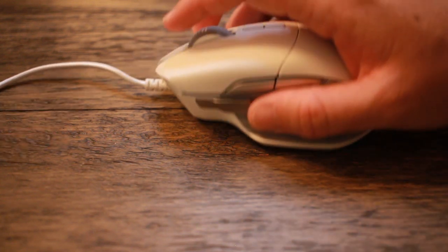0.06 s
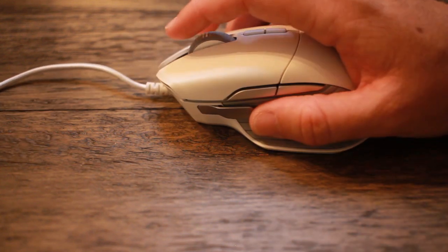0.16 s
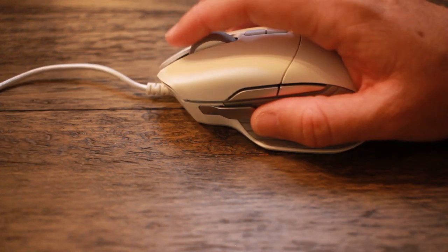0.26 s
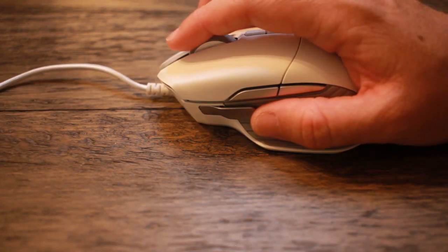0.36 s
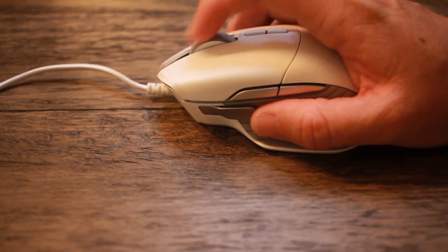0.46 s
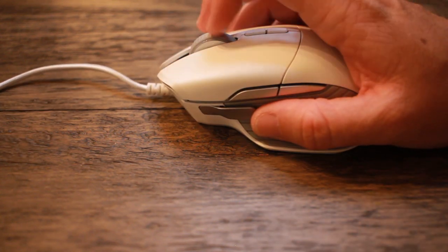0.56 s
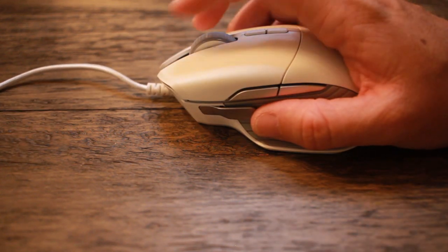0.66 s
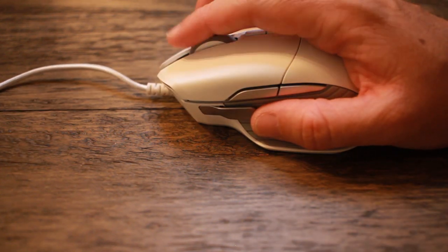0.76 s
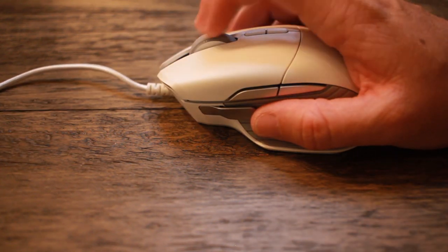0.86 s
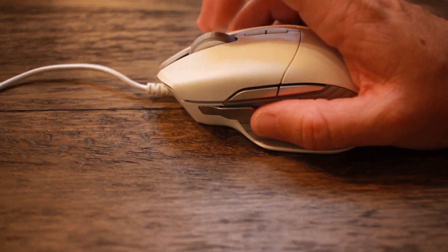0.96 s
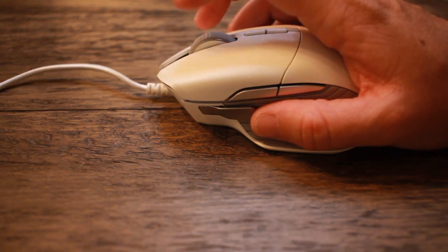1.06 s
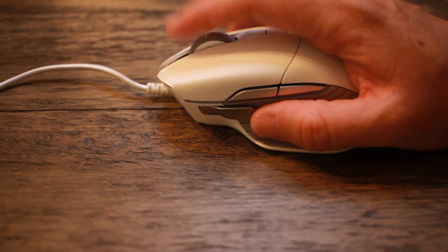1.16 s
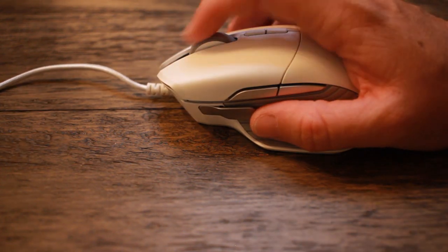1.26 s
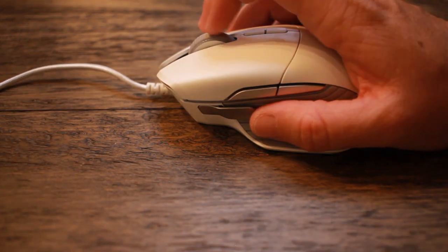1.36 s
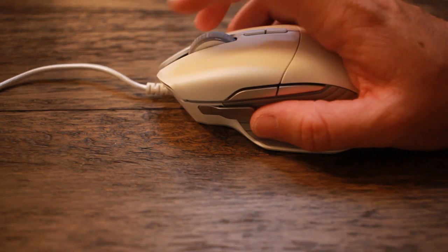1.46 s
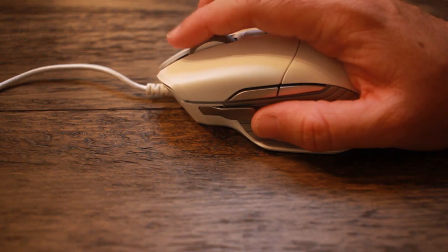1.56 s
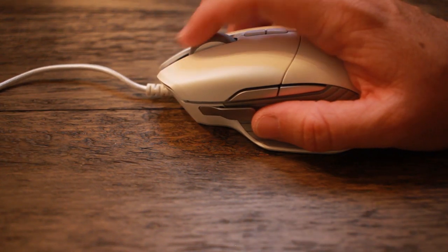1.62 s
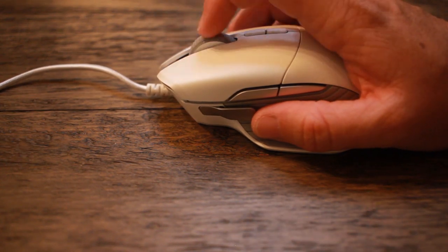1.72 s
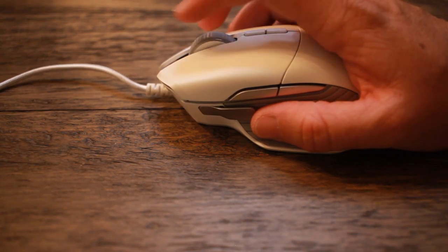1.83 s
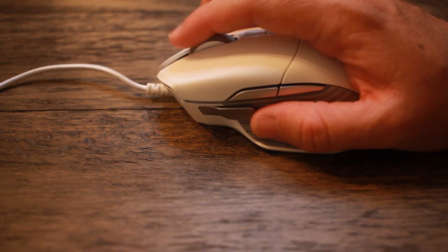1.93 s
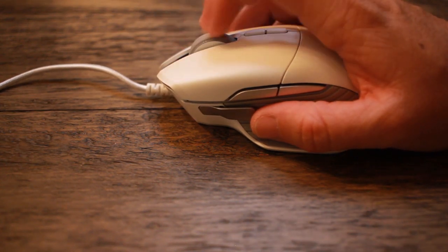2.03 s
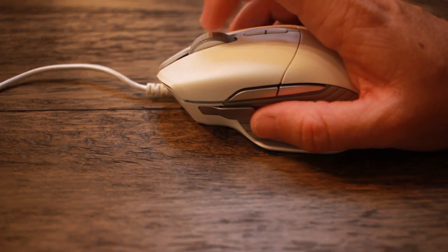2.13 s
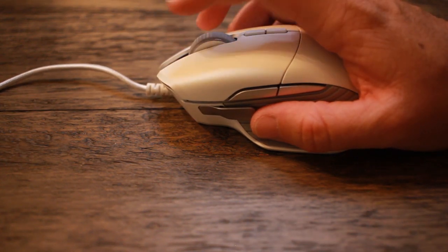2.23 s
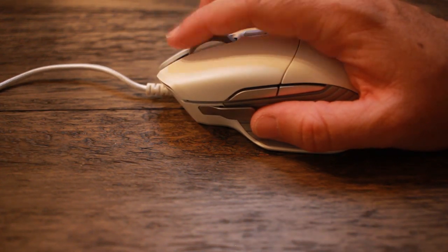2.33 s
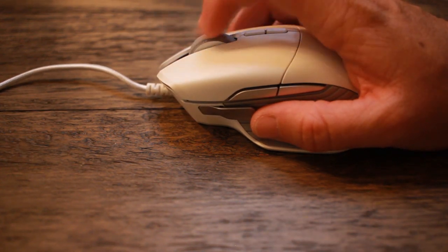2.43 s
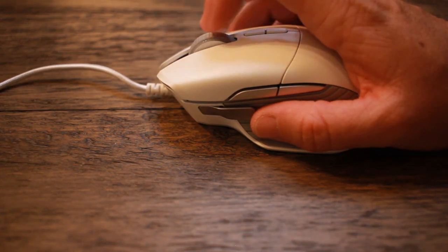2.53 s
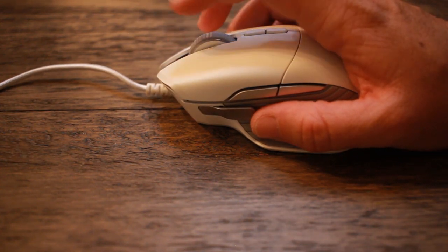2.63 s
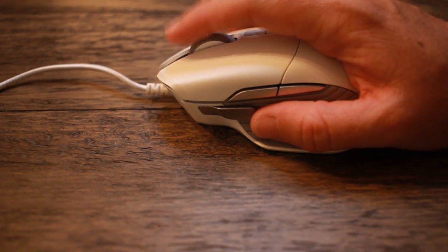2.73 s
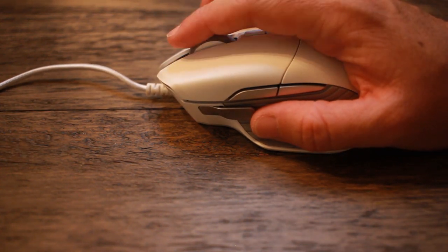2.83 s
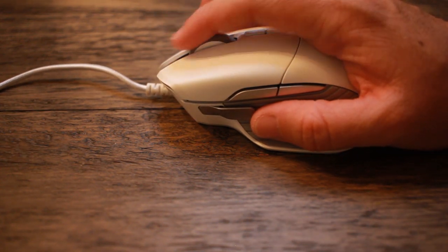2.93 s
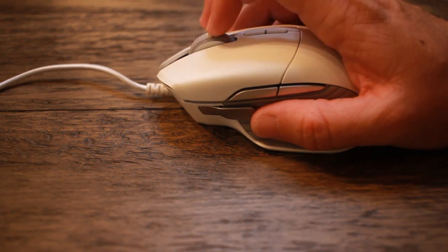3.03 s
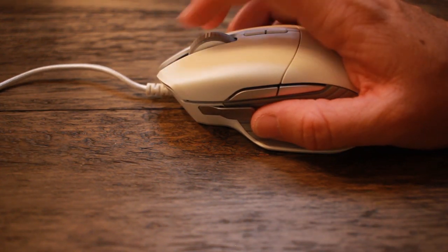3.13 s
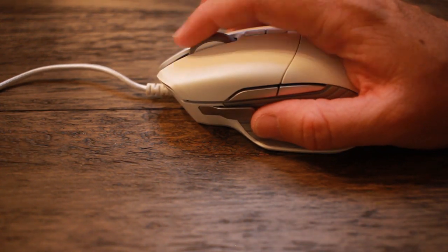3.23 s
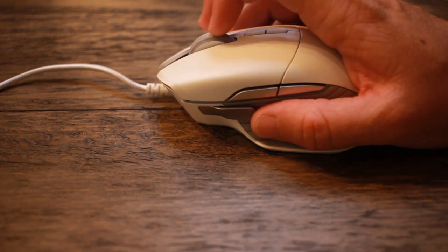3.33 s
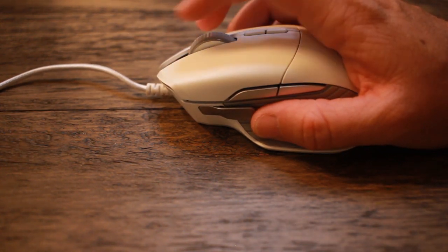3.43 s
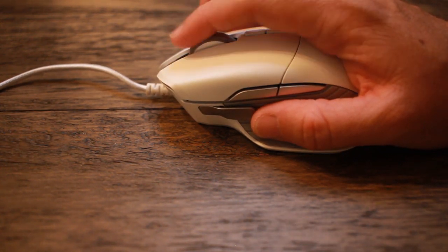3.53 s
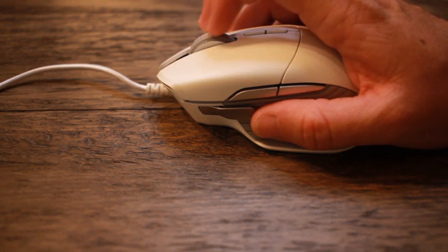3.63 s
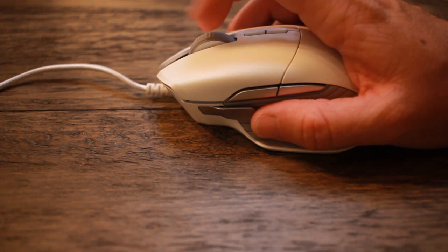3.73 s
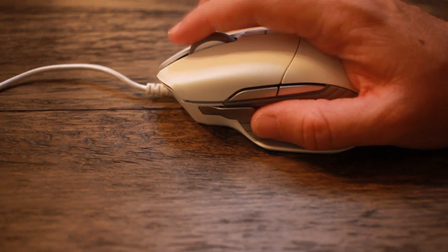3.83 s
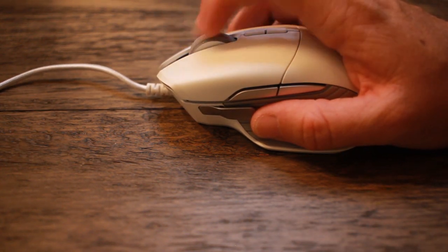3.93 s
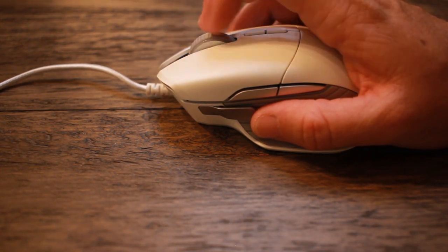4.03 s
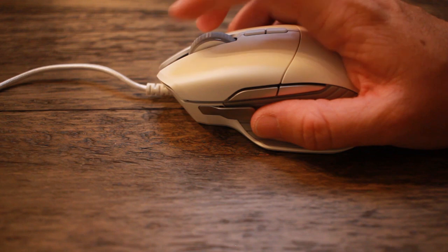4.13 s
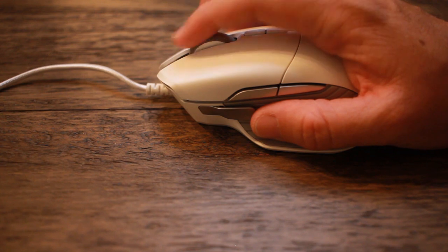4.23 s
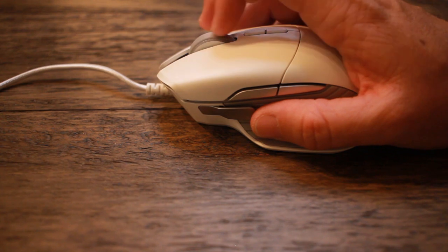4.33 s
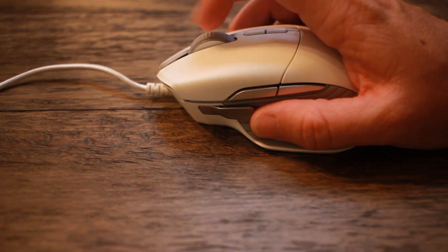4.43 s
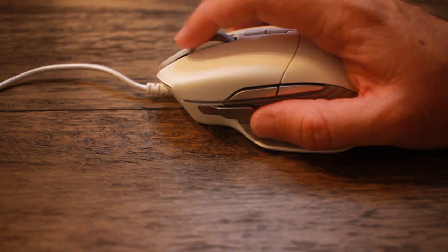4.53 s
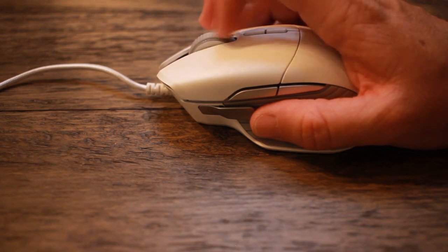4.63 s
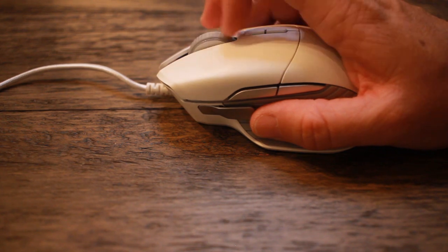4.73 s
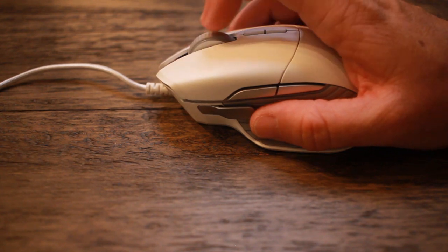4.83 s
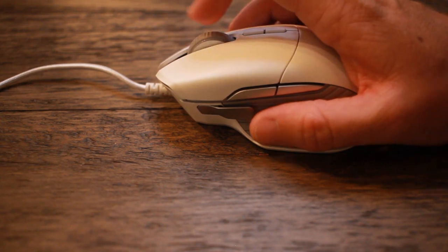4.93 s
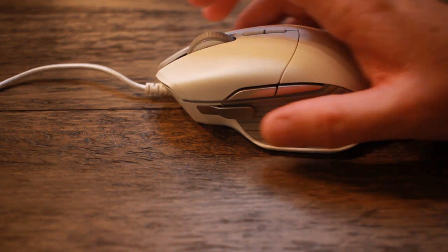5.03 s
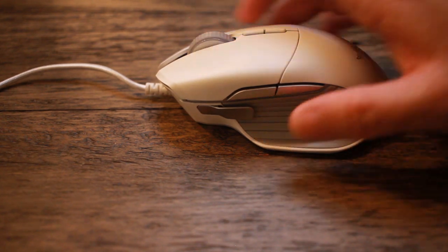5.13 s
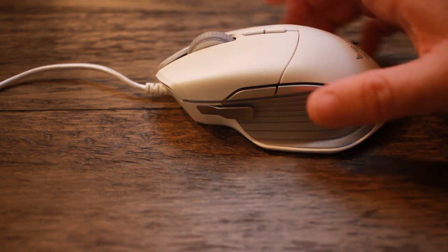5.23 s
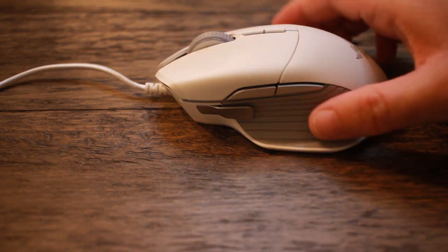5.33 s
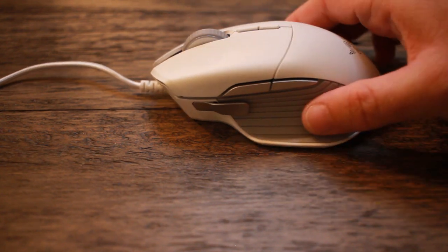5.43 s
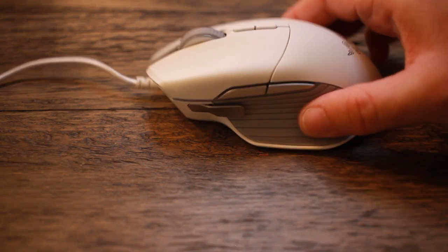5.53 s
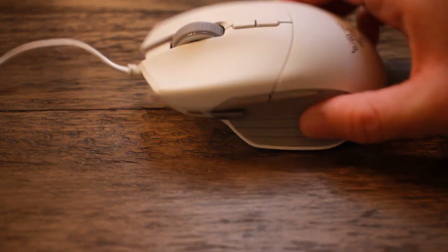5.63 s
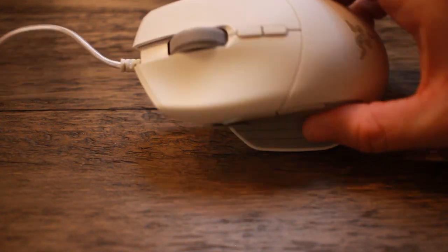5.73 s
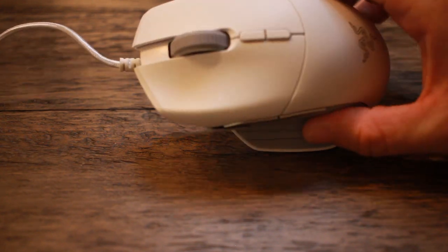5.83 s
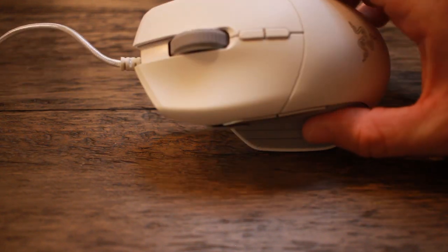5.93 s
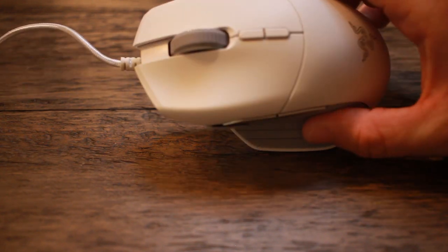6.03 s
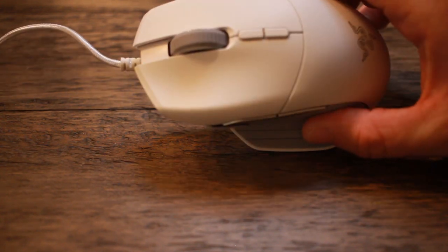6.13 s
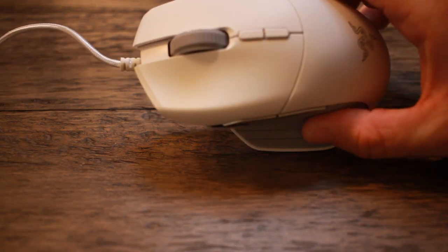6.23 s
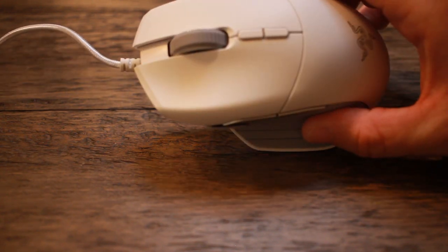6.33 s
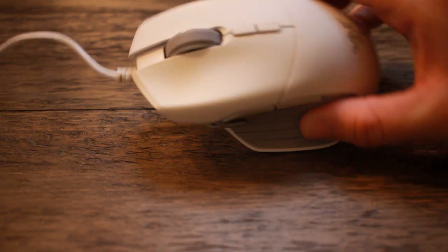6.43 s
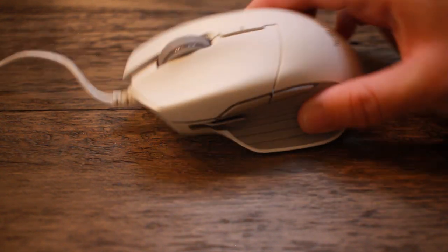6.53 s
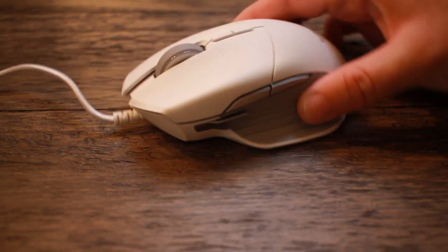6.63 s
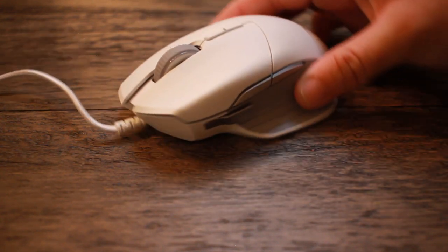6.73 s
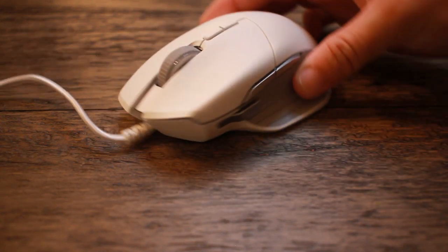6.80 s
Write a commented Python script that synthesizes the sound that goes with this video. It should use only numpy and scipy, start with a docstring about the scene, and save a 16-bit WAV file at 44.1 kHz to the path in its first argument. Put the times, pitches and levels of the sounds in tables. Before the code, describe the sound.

Close, crisp ratchet bursts from a heavy mouse wheel, framed by two solid set-down thuds on a wooden desk in a quiet room.

```python
"""A mouse thumps down on a wooden desk in a quiet room, then its stiff notched wheel clicks in short strokes.
Set-downs, finger landings, lifts and bumps are short soft blows that ring the desk and the mouse's shell.
Sliding is uneven noise: a low rumble rung through the desk and a hiss of skin and feet.
Each wheel notch is a quick run of tiny contacts that rings the wheel, the spring and the plastic shell.
A faint echo, room tone and hiss surround it all, heard close up."""
import sys
import numpy as np
from scipy import signal
from scipy.io import wavfile
from scipy.ndimage import uniform_filter1d

SR = 44100
rng = np.random.default_rng(int(sys.argv[2]) if len(sys.argv) > 2 else 0)


def wav_out(sig):
    """Save sig, one row per channel (or a flat mono array), as 16-bit PCM at SR to the path in sys.argv[1]."""
    wavfile.write(sys.argv[1], SR, np.round(np.clip(np.atleast_2d(sig).T, -1, 1) * 32767).astype(np.int16))


N = 302671  # length in samples

# The mouse meets the desk: t/s, level/dB, f/Hz of the blow,
# then desk boom/dB, shell clack/dB and tick/dB, each relative to the blow
SET_DOWNS = [(.171, -9, 448, -34, -23, -29), (.191, -9, 340, -49, -10.5, -14.5),
             (.196, -15, 410, -30, -37, -20), (.209, -21, 340, -53, -10.5, -14),
             (6.757, -31.5, 500, -3, -2, -25), (6.77, -13.5, 331, -44, -15, -22),
             (6.773, -10, 364, -16, -15.5, -23)]
SET_DOWN_TICK_HZ, SET_DOWN_SCUFF_MS = 2700, 3.4
# The hand bumps the shell: t/s, level/dB, f/Hz of the blow, tick/dB relative to the blow, tick f/Hz
BUMPS = [(.423, -35.5, 355, -9, 4970), (2.876, -35.5, 440, -17, 2170), (2.911, -36.5, 351, -31, 1800),
         (2.932, -27.5, 372, -14.5, 3000), (3.205, -30, 523, -7, 2930), (4.963, -44, 555, 4.5, 1720),
         (4.98, -38.5, 836, -10, 2600), (5.028, -46.5, 574, 3.5, 3430), (5.042, -49, 366, 3, 3150),
         (5.361, -42, 382, -19, 2100), (5.432, -32, 443, -16, 5000), (5.468, -34.5, 766, -8, 1860),
         (5.528, -39, 744, -8, 1700), (5.695, -48, 414, 2, 3350), (5.757, -35.5, 343, -16, 4740),
         (5.775, -33.5, 237, -25, 3000), (6.61, -48, 350, -25, 1716), (6.66, -43, 361, -22, 3530)]
BUMP_BOOM_DB, BUMP_CLACK_DB, BUMP_SCUFF_MS = -13.5, -11.5, 3.2
# The finger leaves the wheel after a stroke: t/s, level/dB, f/Hz of the blow
LIFTS = [(.643, -26.5, 678), (1.022, -33, 805), (1.451, -34.5, 550), (3.14, -30.5, 540),
         (3.413, -29.5, 590), (4.092, -27.5, 783), (4.798, -38, 791)]
# Shared by all lifts: boom/dB, clack/dB, tick/dB relative to the blow, tick f/Hz, scuff decay/ms
LIFT_SOUND = (-45, -7, -10.5, 5100, 1)
# The finger lands on the wheel before a stroke: t/s, level/dB, f/Hz of the blow, boom/dB relative to it
LANDINGS = [(.837, -39.5, 340, -5), (1.269, -39, 350, -10), (1.622, -33.5, 367, -5), (2.004, -42, 571, 1),
            (2.408, -30.5, 356, -3.5), (3.285, -33, 373, -4.5), (3.6, -42, 363, -4),
            (3.936, -37.5, 584, -6), (4.268, -32.5, 760, -6.5), (4.608, -32, 780, -0.5)]
# Shared by all landings: clack/dB, tick/dB relative to the blow, tick f/Hz, scuff decay/ms
LANDING_SOUND = (-12, -7, 4005, 7.5)

# Ways the desk top rings: f/Hz, relative level/dB, time to die by 60 dB with no hand on it/s
DESK_MODES = [(186.1, -5, 0.46), (245, -3.5, 0.32), (289.6, -2.5, 0.25), (353, -9, 0.42), (420, -5, 0.2),
              (446, -8, 0.21), (499.4, -7, 0.2), (662, -4, 0.046), (748.5, -9.5, 0.22), (847, -13, 0.15),
              (952, -9.5, 0.08), (1290, -17.5, 0.084)]
# Lowest ways the desk rings: f/Hz, relative level/dB, time to die by 60 dB/s
BOOM_MODES = [(55, -7.5, 0.24), (81.5, -3.5, 0.35), (120.25, 1.5, 0.35)]
# Ways the plastic shell rings: f/Hz, relative level/dB, time to die by 60 dB with no palm on it/s
SHELL_MODES = [(557, -8, 0.046), (781, -6, 0.078), (1015, -2.5, 0.041), (1239, -6, 0.024),
               (1520, -9, 0.021), (1795, -17.5, 0.033)]

# Hand or mouse sliding: t/s when full level is reached, rise/s, hold/s, fall/s,
# rumble level/dB, hiss level/dB, centre f/Hz of the hiss
SLIDES = [(0.212, 0.024, .003, 0.065, -31, -70, 3610), (0.297, 0.085, 0.15, 0.11, -52.5, -57.5, 5600),
          (.5, 0.11, 0.0028, 0.088, -61, -52, 5640), (3.06, 0.071, 0.016, 0.069, -47, -45, 4400),
          (3.211, 0.25, 0.059, 0.17, -48.5, -73, 4450), (4.977, 0.084, 0.072, 0.034, -55, -64, 3000),
          (5.41, .04, 0.15, 0.12, -51, -69, 4500), (5.434, .03, .03, 0.04, -50, -55.5, 4700),
          (5.695, .03, .003, .05, -43.5, -62, 4240), (5.732, 0.025, 0.027, 0.019, -49, -58, 4800),
          (5.77, 0.025, 0.032, 0.024, -44, -80, 4800), (6.665, .045, 0.069, .03, -45.5, -69, 3900),
          (6.73, 0.094, 0.15, 0.11, -54, -55.5, 4270), (6.77, 0.032, 0.056, 0.19, -40, -60, 4600)]
# Broad part of the sliding hiss: f/Hz, relative level/dB
SLIDE_HISS = [(700, -15), (1200, 5.5), (2500, 2), (7000, -9), (10000, -9.5), (14000, -21)]
SLIDE_END_DB = -20  # level at the ends of a slide, relative to its full level
HAND_DAMPING = 0.53  # the resting hand shortens the desk's ring times by this factor

# Wheel notches: t/s, level/dB (sets the loudness and the colour of each snap)
NOTCHES = [(0.493, -33), (0.4967, -26), (0.5052, -32), (0.5285, -16.5), (0.5436, -15.5), (0.5615, -17.5),
           (0.5894, -18.5), (0.841, -39), (0.8727, -30), (0.8919, -16.5), (0.9068, -16), (0.9206, -15.5),
           (0.9335, -15.5), (0.9504, -21.5), (0.9878, -20), (1.272, -42), (1.3067, -34), (1.3283, -18.5),
           (1.346, -17), (1.3611, -16), (1.377, -18.5), (1.3968, -19.5), (1.4521, -32), (1.6233, -40),
           (1.6816, -31), (1.7067, -19.5), (1.7326, -20.5), (1.7609, -21), (1.795, -21.5), (1.8327, -41),
           (2.008, -40), (2.04, -30), (2.0599, -17), (2.0732, -14.5), (2.086, -15.5), (2.0992, -16),
           (2.1149, -18.5), (2.1427, -19), (2.1739, -35), (2.4108, -40.5), (2.449, -30.5), (2.4689, -15),
           (2.4841, -15.5), (2.4963, -14.5), (2.5078, -19), (2.5259, -17), (2.5607, -24), (2.5904, -40.5),
           (3.009, -32), (3.0336, -18), (3.0499, -14.5), (3.0615, -16.5), (3.0749, -17), (3.0898, -18),
           (3.1369, -32.5), (3.2551, -32.5), (3.296, -41.5), (3.3259, -29), (3.3429, -15), (3.3544, -16),
           (3.3659, -15.5), (3.379, -18.5), (3.4101, -31.5), (3.6016, -39.5), (3.632, -29.5), (3.6512, -16),
           (3.665, -15.5), (3.6784, -14.5), (3.6939, -16.5), (3.7157, -20.5), (3.7692, -39.5), (3.938, -41),
           (3.962, -34.5), (3.98, -15.5), (3.9946, -15), (4.0062, -16.5), (4.019, -16.5), (4.036, -18),
           (4.271, -36.5), (4.2822, -39), (4.3125, -28), (4.32, -25), (4.339, -15), (4.352, -15),
           (4.3642, -17.5), (4.3788, -17), (4.3961, -18), (4.4579, -36), (4.61, -32), (4.6425, -22.5),
           (4.666, -16.5), (4.6812, -17.5), (4.6914, -14), (4.7052, -14.5), (4.7212, -18), (4.7558, -48),
           (4.7894, -44)]
# Contacts in one snap (slip off the crest, landing, rebounds): delay/ms, level/dB, treble level/dB
CONTACTS = [(0., -5.5, -4), (0.648, 1, 7), (1.202, -6, 3), (1.8, -16.5, -5), (3.002, -21.5, -37),
            (4.103, -5.5, -6), (5.398, -15, -32)]
# Ways the wheel rings: f/Hz, relative level/dB, time to die by 60 dB/s
WHEEL_MODES = [(2237, -6.5, 0.0078), (2747, -6, 0.011), (3023, -10.5, 0.02), (3525, -10.5, 0.0083),
               (3930, -6, 0.0089), (4316, -2.5, 0.0089), (4529, -3, 0.019), (5000, -0.5, 0.011),
               (5354, -7, 0.025), (5870, -5.5, 0.011), (6415, -1.5, 0.0059), (7200, -9, 0.013),
               (7520, -21.5, 0.024)]
# Ways the spring rings: f/Hz, relative level/dB, time to die by 60 dB/s
SPRING_MODES = [(7790, -7, 0.016), (8520, -0.5, 0.0039), (8850, -5.5, 0.0088), (9490, -2.5, 0.0043),
                (10580, -11, 0.0087), (11010, -13, 0.011), (11070, -3.5, 0.0065), (12440, -16, 0.0075),
                (13340, -9.5, 0.0057), (15270, -20, 0.013), (15600, -42, .006)]
FULL_SNAP_DB = -16  # notch level that counts as a full snap
HOLLOW_DB, TREBLE_DB = -12.8, -9  # starting balance of shell and spring in a full snap
HOLLOW_PER_DB, TREBLE_PER_DB = 0.4037, -0.34  # a weaker snap is hollower and duller, per dB below full
SCATTER_DB = 1.5  # random spread of that balance
PALM_DAMPING = 0.77  # the palm shortens the shell's ring times during strokes by this factor

# Time for echoes to die by 60 dB: f/Hz, time/s
ECHO_TIMES = [(100, 0.33), (260, 1), (700, 0.5), (1840, 0.42), (4850, 0.38), (12000, 0.29)]
# Room tone and hiss shared by both channels: f/Hz, relative level/dB
ROOM_TONE = [(15, -43), (25, -25), (58, 1), (76, 1), (153, -21.5), (190, 5), (263, -16.5), (301, -5.5),
             (326, -14.5), (591, -16), (677, -20), (2550, -27.5), (3340, -27.5), (14400, -33),
             (16000, -32.5)]
# Hiss with opposite signs in the two channels: f/Hz, relative level/dB
SIDE_HISS = [(15, -27), (25, -2), (489, -3.5), (4370, -5), (14800, 0), (16000, -16)]
ECHO_DB, ROOM_TONE_DB, SIDE_HISS_DB = -13, -54.5, -68.5
TOP_EDGE_HZ = 15900  # upper edge of the sound


def gain_of(db):
    """Turns decibels into a multiplier."""
    return 10 ** (np.asarray(db) / 20)


def evened(x):
    """Scales a sound so that its average strength (rms) is 1."""
    return x / np.sqrt(np.mean(x ** 2) + 1e-20)


def read(points, hz):
    """Reads a table between its points, along a log frequency scale."""
    f, value = np.transpose(points)
    return np.interp(np.log(hz + 1), np.log(f + 1), value)


def add(mix, s, sound, db=0):
    """Mixes a sound in at time s, at a level in dB."""
    part = mix[round(s * SR):][:len(sound)]
    part += gain_of(db) * sound[:len(part)]


def peaked(x):
    """Scales a sound so that its peak is 1."""
    return x / abs(x).max()


def ring(modes, count, vary_db=0, detune=1):
    """A struck object rings as a sum of dying sines of alternating sign; vary_db and detune colour one blow."""
    hz, db, t60 = np.transpose(modes)[:, :, None]
    t = np.arange(count) / SR
    sign = (-1.) ** np.arange(len(modes))[:, None]
    loudness = gain_of(db + vary_db - 60 * t / t60)
    return peaked((sign * loudness * np.sin(2 * np.pi * hz * detune * t)).sum(0))


def damped(modes, factor):
    """A touch soaks up vibration, so every mode dies sooner."""
    return [(hz, db, factor * t60) for hz, db, t60 in modes]


def noise(spectrum):
    """Steady noise: random spectra are shaped by a table and overlapped."""
    hz = np.fft.rfftfreq(1024, 1 / SR)
    real, imag = rng.standard_normal((N // 256 + 5, 513, 2)).T
    shaped = (real + 1j * imag) * gain_of(read(spectrum, hz))[:, None]
    return evened(signal.istft(shaped, nperseg=1024, noverlap=768)[1][:N])


def bandpass(x, low_hz, high_hz):
    """Keeps the sound between two frequencies."""
    return signal.lfilter(*signal.butter(2, [low_hz, high_hz], "band", fs=SR), x)


def all_blows():
    """Lists every knock with the boom, clack, tick and scuff of its kind."""
    rows = [(*row, SET_DOWN_TICK_HZ, SET_DOWN_SCUFF_MS) for row in SET_DOWNS]
    for s, db, hz, tick_db, tick_hz in BUMPS:
        rows.append((s, db, hz, BUMP_BOOM_DB, BUMP_CLACK_DB, tick_db, tick_hz, BUMP_SCUFF_MS))
    rows += [(*row, *LIFT_SOUND) for row in LIFTS]
    rows += [(*row, *LANDING_SOUND) for row in LANDINGS]
    return rows


def knocks():
    """A soft blow of nearly two swings rings the desk, while a scuff makes the shell clack and tick."""
    out = np.zeros(N)
    desk, boom = ring(DESK_MODES, count=SR // 2), ring(BOOM_MODES, count=SR // 2)
    shell = ring(SHELL_MODES[1:], count=2600)
    for s, db, hz, boom_db, clack_db, tick_db, tick_hz, scuff_ms in all_blows():
        turns = np.arange(0, 1.8, hz / SR)
        add(out, s, np.sin(2 * np.pi * turns) * np.hanning(len(turns)), db)
        push = np.hanning(len(turns) // 5 + 3)  # a slower blow reaches only the lower modes
        push /= push.sum()
        add(out, s, signal.oaconvolve(push, desk), db - 9)
        add(out, s, signal.oaconvolve(push, boom), db + boom_db)
        scuff = rng.standard_normal(1024) * np.exp(-np.arange(1024) * 1000 / SR / scuff_ms)
        add(out, s, peaked(signal.fftconvolve(scuff, shell)), db + clack_db)
        add(out, s, peaked(bandpass(scuff, 0.7 * tick_hz, 1.69 * tick_hz)), db + tick_db)
    return out


def handling():
    """Uneven friction shakes the desk modes and hisses as skin and feet slide."""
    t = np.arange(N) / SR
    lumps = evened(uniform_filter1d(rng.standard_normal(N), 300))
    # skin sticks and lets go in small jerks, about 90 a second
    catches = (rng.random(N) < 90 / SR) * rng.exponential(1.27, N)
    grit = gain_of(2.0 * lumps) + signal.oaconvolve(catches, np.exp(-np.arange(512) / 90))[:N]

    held_desk = ring(damped(DESK_MODES, HAND_DAMPING), count=8000)
    rumble = evened(signal.oaconvolve(rng.standard_normal(N) * grit, held_desk)[:N])

    # a spinning carrier lifts low noise up to the moving centre frequency
    full_s, *_, centre_hz = np.transpose(SLIDES)
    carrier = np.exp(2j * np.pi * np.cumsum(np.interp(t, full_s, centre_hz)) / SR)
    low = signal.lfilter(*signal.butter(2, 900, fs=SR), rng.standard_normal((2, N)))
    moving_band = evened((carrier * (low[0] + 1j * low[1])).real)
    hiss = evened((moving_band + gain_of(0.5) * noise(SLIDE_HISS)) * np.sqrt(grit))

    out = np.zeros(N)
    for s, rise, hold, fall, rumble_db, hiss_db, _ in SLIDES:
        outside = np.maximum(np.maximum((s - t) / rise, (t - s - hold) / fall), 0)
        envelope = uniform_filter1d(gain_of(SLIDE_END_DB * outside), 300)
        out += envelope * (gain_of(rumble_db) * rumble + gain_of(hiss_db) * hiss)
    return out


def wheel():
    """Every notch is a short run of contacts ringing wheel, spring and shell; each also jolts the desk."""
    out, jolts = np.zeros(N), np.zeros(N)
    held_shell = damped(SHELL_MODES, PALM_DAMPING)
    delay_ms, body_db, treble_db = np.transpose(CONTACTS)
    count = len(delay_ms)
    for s, db in NOTCHES:
        weaker_db = FULL_SNAP_DB - db
        hollow_db = HOLLOW_DB + HOLLOW_PER_DB * weaker_db + SCATTER_DB * rng.standard_normal()
        bright_db = TREBLE_DB + TREBLE_PER_DB * weaker_db + SCATTER_DB * rng.standard_normal()
        # later contacts vary more in time
        late_ms = delay_ms + .02 * rng.standard_normal(count) * np.sqrt(delay_ms)
        at = np.abs(np.round(late_ms * SR / 1000)).astype(int)
        # the spring chatters: a dying burst of noise under the contacts
        chatter = gain_of(-17) * rng.standard_normal(512) * np.exp(-np.arange(512) / 130)
        body, treble = chatter.copy(), chatter.copy()
        np.add.at(body, at, gain_of(body_db + 1.2 * rng.standard_normal(count)))
        np.add.at(treble, at, gain_of(treble_db + 1.5 * rng.standard_normal(count)))
        parts = [(WHEEL_MODES, body, db + 2.0),
                 (SPRING_MODES, treble, db + bright_db + 3.0),
                 (held_shell, body, db + hollow_db + 3.5)]
        for modes, contacts, level_db in parts:
            colour_db, shift = rng.standard_normal((2, len(modes), 1))
            rung = ring(modes, count=1800, vary_db=1.2 * colour_db, detune=1 + .008 * shift)
            add(out, s, peaked(signal.fftconvolve(contacts, rung)), level_db)
        add(jolts, s, np.hanning(64) / 32, db + hollow_db)
    boom, desk = ring(BOOM_MODES, count=SR // 2), ring(DESK_MODES, count=SR // 2)
    shaken_desk = gain_of(-9.5) * boom + gain_of(-10.5) * desk
    return out + signal.oaconvolve(jolts, shaken_desk)[:N]


def room(x):
    """Sparse echoes die at a different speed in each band; three tails take turns at a steady rate."""
    slots, out = np.arange(300, SR - 20, 20), np.zeros(N)
    for k in range(3):
        taps = np.zeros(SR)
        taps[slots + rng.integers(0, 20, len(slots))] = rng.choice([-1., 1.], len(slots))
        hz, t, bands = signal.stft(taps, SR, nperseg=256)
        die_s = np.maximum(read(ECHO_TIMES, hz), .02)[:, None]
        tail = signal.istft(bands * gain_of(-60 * t / die_s), SR, nperseg=256)[1]
        # taking turns 11 times a second, so that no fixed set of echo peaks stands out;
        # the three powers always sum to 1
        share = np.sqrt(2 / 3) * np.cos(np.pi * (11 * np.arange(N) / SR + k / 3))
        out += signal.fftconvolve(x * share, tail / np.linalg.norm(tail))[:N]
    return out


def scene():
    """Both channels share the desk sounds, echo and room tone; a faint hiss has opposite signs in them."""
    near = knocks() + handling() + wheel()
    middle = near + gain_of(ECHO_DB) * room(near) + gain_of(ROOM_TONE_DB) * noise(ROOM_TONE)
    side = gain_of(SIDE_HISS_DB) * noise(SIDE_HISS)
    return middle + np.array([[1], [-1]]) * side


def record(dry):
    """Removes everything above the top edge with a steep low-pass filter."""
    low_pass = signal.firwin(511, TOP_EDGE_HZ, window=("kaiser", 9), fs=SR)
    return signal.oaconvolve(dry, low_pass[None], "same")


dry = scene()
out = record(dry)
wav_out(out)
```